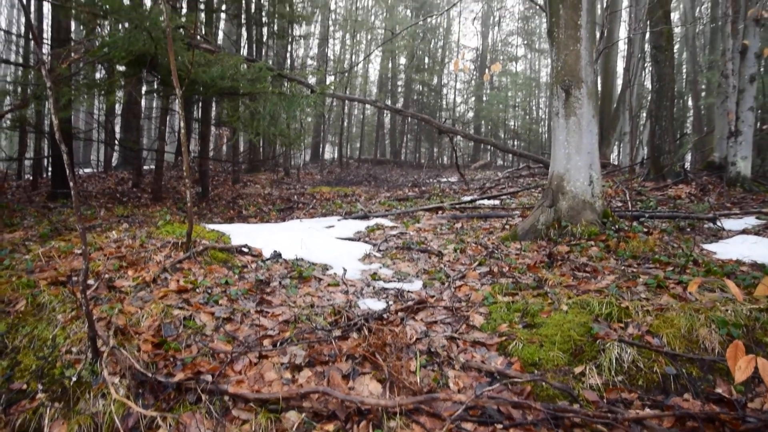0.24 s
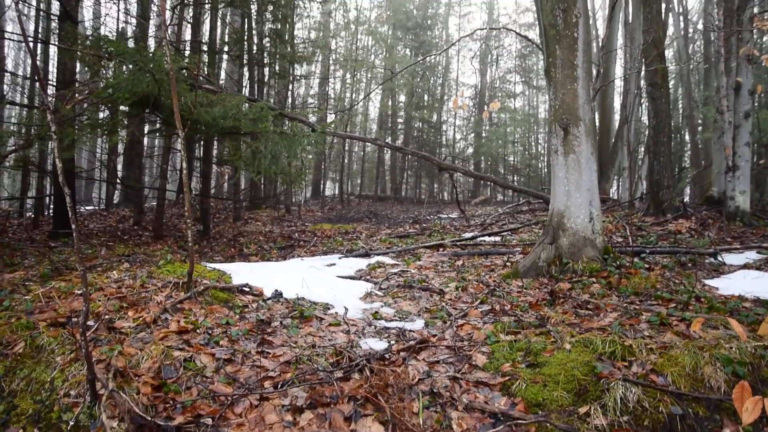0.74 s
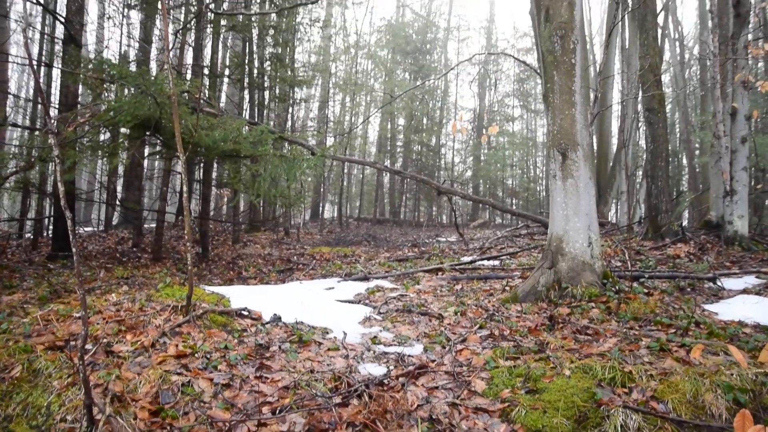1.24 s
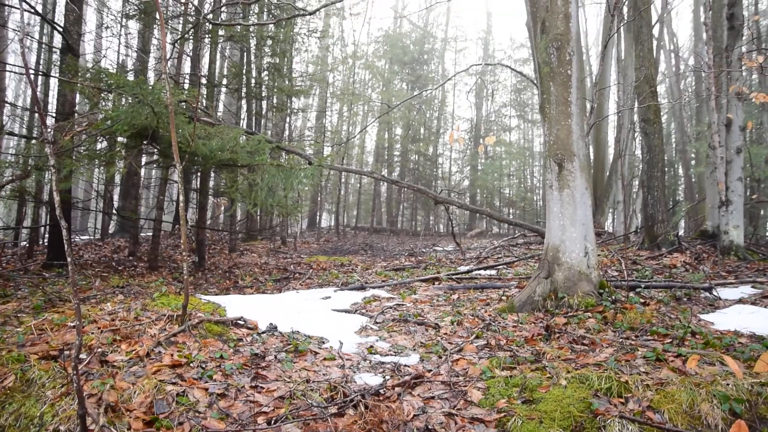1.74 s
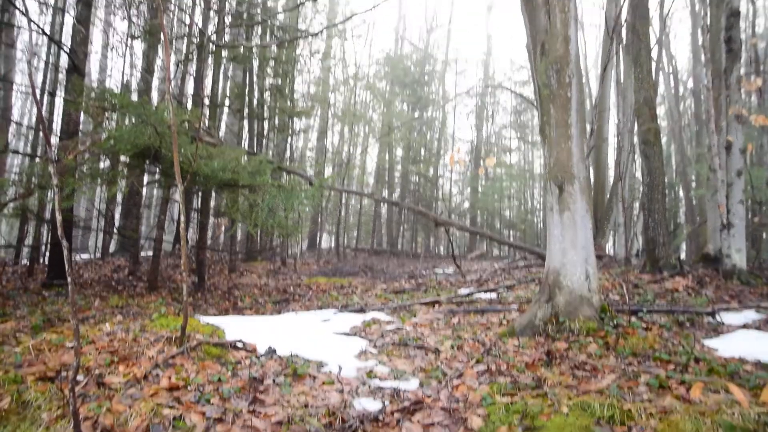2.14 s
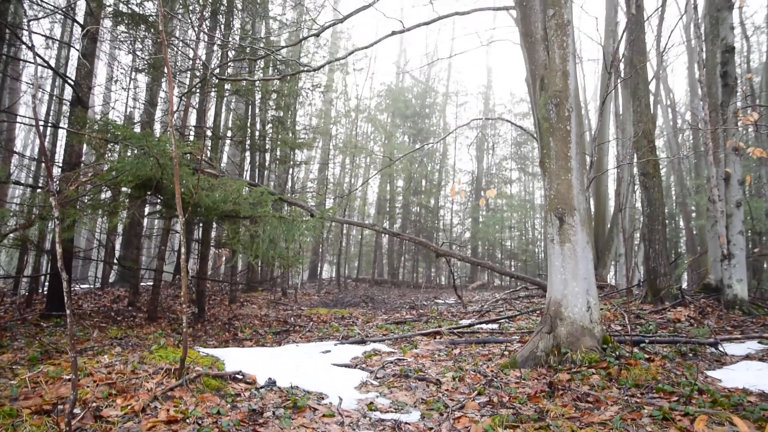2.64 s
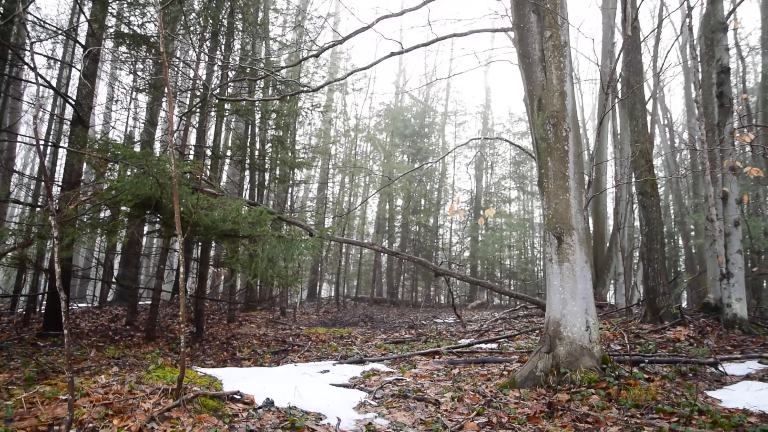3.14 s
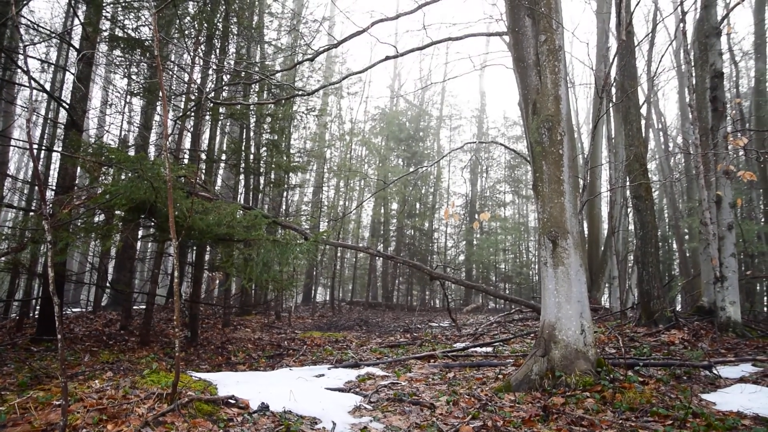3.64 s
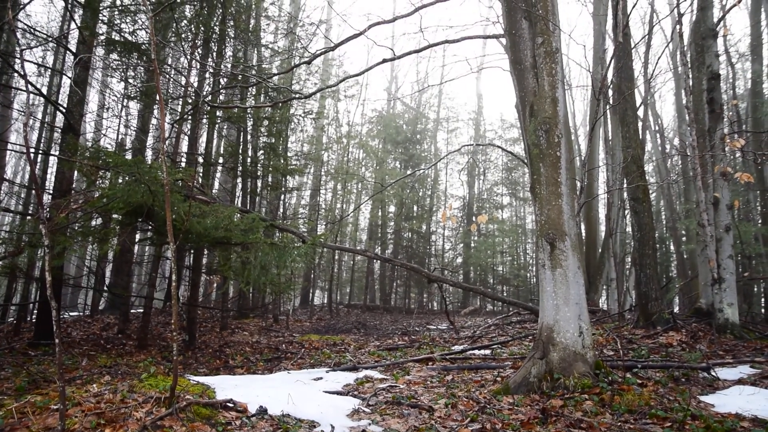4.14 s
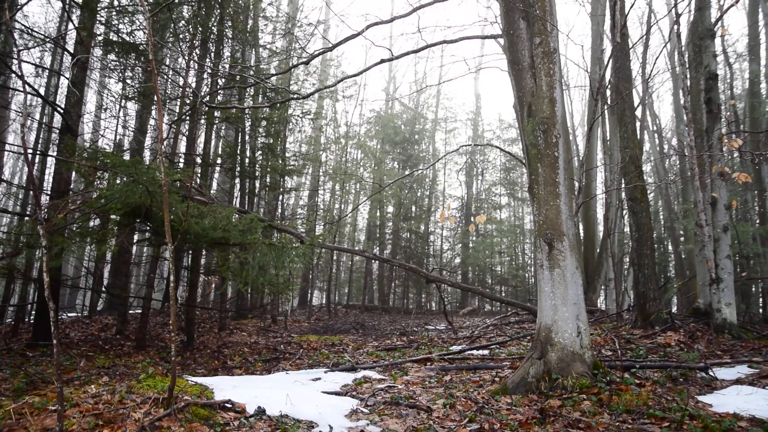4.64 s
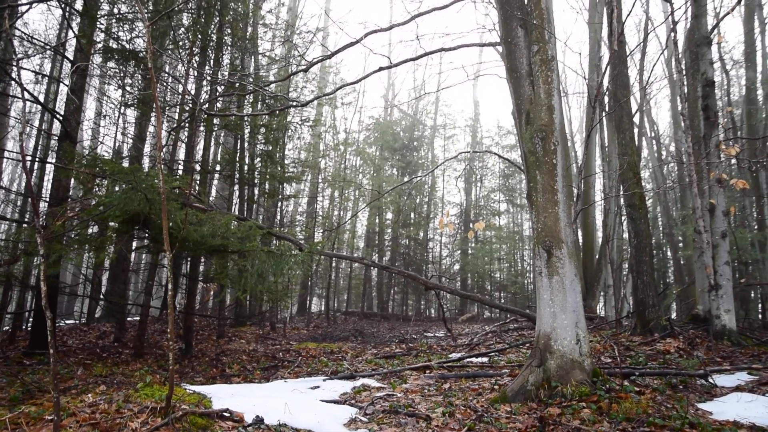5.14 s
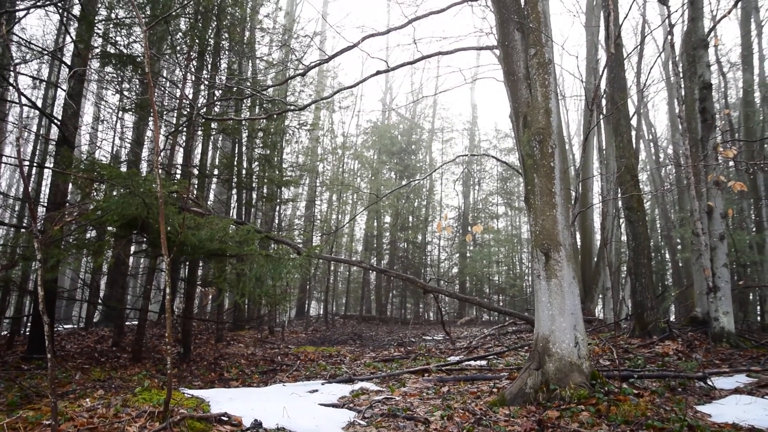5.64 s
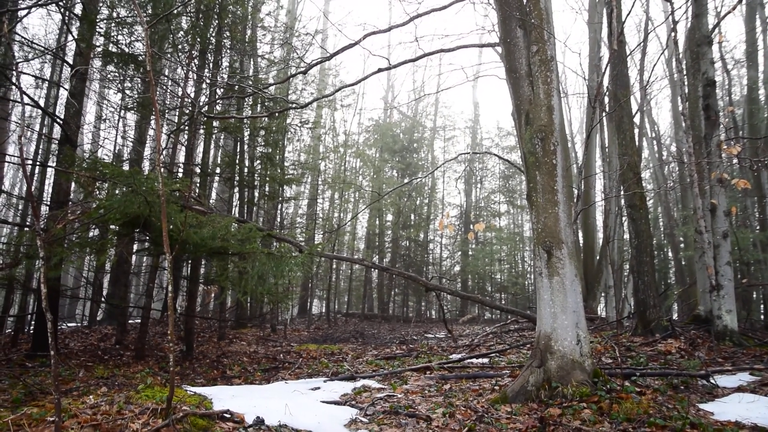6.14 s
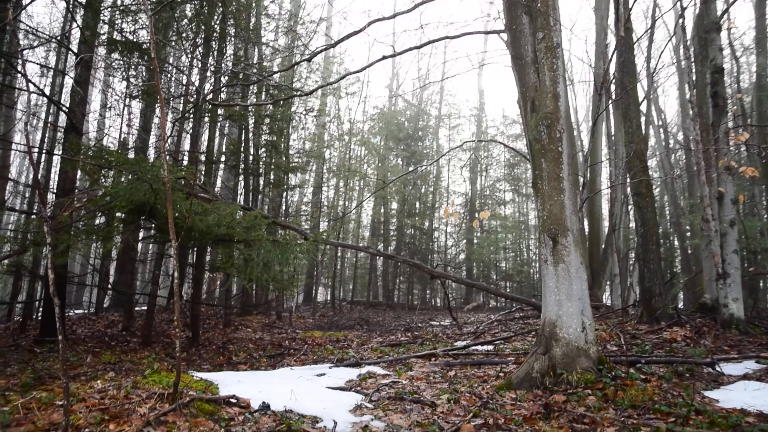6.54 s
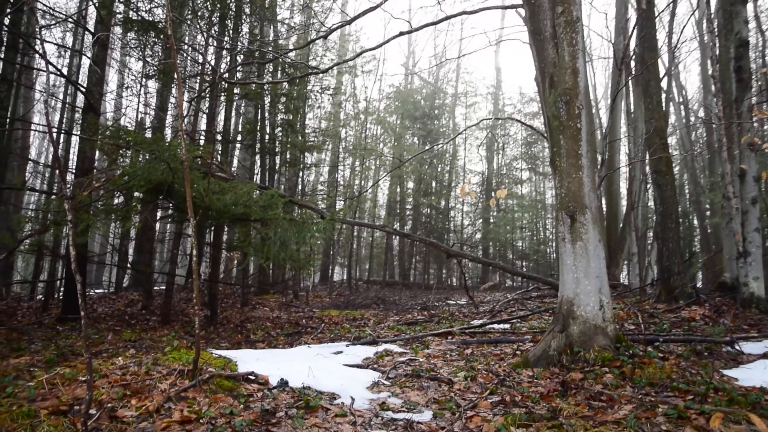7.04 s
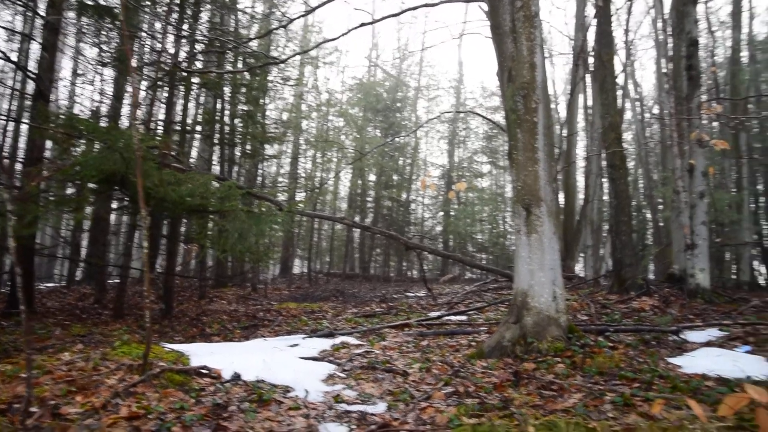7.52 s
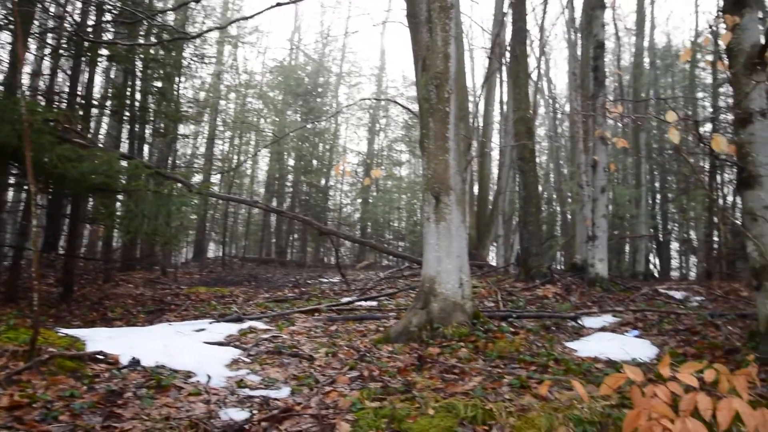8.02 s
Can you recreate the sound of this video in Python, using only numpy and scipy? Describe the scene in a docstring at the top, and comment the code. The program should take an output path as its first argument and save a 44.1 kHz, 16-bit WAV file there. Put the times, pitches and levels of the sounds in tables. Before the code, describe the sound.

A woodpecker's rapid roll on a hollow trunk dominates the middle, its woody knocks speeding up, fading late and ringing through the trees. Before it come brief whistled chirps and two distant caws; afterward, sparse drips on leaves and faint chirps. The camera microphone also picks up close plastic creaks, constant gritty motor noise, soft hiss and a very thin high whine, ending with a click and rubbing.

```python
"""Woodpecker roll in a misty forest

A woodpecker drums one quickening roll on a hollow trunk: pulses ring trunk modes, trunks echo, a long tail
follows. A far crow (pulses through a throat) caws twice, small birds chirp (gliding tones), drops fall on
leaves (noise). The hand-held camera adds noise ringing in its plastic body: gritty whirr of the lens drive,
creaks, a finger rub. It also adds a snap, a weak creak just after it, and a thin electronic whistle; forest air
and microphone hiss lie beneath."""
import sys
import numpy as np
from scipy import signal
from scipy.fft import rfft, irfft, next_fast_len
from scipy.io import wavfile
from scipy.ndimage import map_coordinates

SR = 44100
rng = np.random.default_rng(int(sys.argv[2]) if len(sys.argv) > 2 else 0)


def makeup_ratio(level_db):
    """Linear amplitude ratio for a level in decibels (20 dB per factor of ten)."""
    decades = np.asarray(level_db, float) / 20
    return 10 ** decades


def master(y):
    """Save y as 16-bit WAV."""
    cut = np.clip(np.atleast_2d(y).T, -1, 1)
    pcm = np.round(cut * 32767)  # scale
    wavfile.write(sys.argv[1], SR, pcm.astype(np.int16))


N = 365148
TIME_S = np.arange(N) / SR


def unit(x):
    """Scaled to rms 1."""
    return x / np.sqrt(np.mean(x ** 2) + 1e-20)


def along(points, hz, axis=1):
    """One column of a frequency table, interpolated on a log axis."""
    table = np.transpose(points)
    return np.interp(np.log(hz + 1), np.log(table[0] + 1), table[axis])


def wobble(rate_hz):
    """Smooth random curve through rate_hz knots a second."""
    knots = rng.standard_normal(int(N * rate_hz / SR) + 4)
    return map_coordinates(knots, [np.arange(N) * rate_hz / SR])


def filtered(x, response):
    """x times a complex response of frequency."""
    size = next_fast_len(N + SR // 2)
    f = np.fft.rfftfreq(size, 1 / SR)
    return irfft(rfft(x, size) * response(f), size)[..., :N]


def delayed(f, s):
    """Response of a pure delay."""
    return np.exp(-2j * np.pi * f * s)


def resonance(f, hz, width_hz):
    """One damped resonance, gain 1 at its centre."""
    return 1j * f * width_hz / (hz * hz - f * f + 1j * f * width_hz)


def modes(table):
    """Response of resonances side by side, successive rows in opposite phase."""
    def response(f):
        return sum((-1) ** k * makeup_ratio(db) * resonance(f, hz, width_hz)
                   for k, (hz, width_hz, db) in enumerate(table))
    return response


def add(x, s, piece):
    """Mixes a piece in at time s."""
    part = x[round(s * SR):][:len(piece)]
    part += piece[:len(part)]


def forest(x, near_db, far_db, side_db):
    """Scatter as decaying noise; high and low bands die at their own rates, far trees answer later."""
    # scatter: f/Hz, near t60/s, far t60/s, level/dB
    scatter = [(300, 0.51, 1.2, 2.5), (545, 0.21, 2.26, -4), (800, 0.32, 1.7, -0.5),
               (1090, 0.41, 1.39, 3.5), (1620, 0.17, 1, -2.5), (1940, .25, 0.83, 7), (2400, .25, 0.65, 4.5),
               (5000, 0.12, 0.38, -6)]
    hz, t, noise = signal.stft(rng.standard_normal((2, 2, 2 * SR)), SR, nperseg=256)
    level_db = along(scatter, hz, axis=3)[:, None]
    tail = 0
    for k, (db, rise_s) in enumerate([(near_db, .018), (far_db, .3)]):
        t60_s = along(scatter, hz, axis=k + 1)[:, None]
        layer = signal.istft(noise[k] * makeup_ratio(level_db - 60 * t / t60_s), SR, nperseg=256)[1]
        layer = layer * (1 - np.exp(-(np.arange(layer.shape[1]) / SR / rise_s) ** 2))
        tail = tail + makeup_ratio(db) * layer / np.linalg.norm(layer[0])
    mid, side = signal.fftconvolve(x[None], tail, axes=1)[:, :N] * makeup_ratio([[0], [side_db]])
    return np.array([mid + side, mid - side])


def blows():
    """Time and strength of every blow: gaps shorten, tiring sets in late, first and last blow are softer."""
    # roll tempo: blow number, gap to next blow/s
    tempo = [(0, .0966), (1, .0909), (6, .0802), (10, .0761), (15, .0726), (16, .0685), (20, .0653)]
    start_s = 3.2995
    fresh_db, tiring_db, tiring_power = 1.07, 8.5, 2.63
    first_soft_db, last_soft_db = 1.5, 1.5
    number, gap_s = np.transpose(tempo)
    k = np.arange(number[-1] + 2)
    s = start_s + np.append(0, np.cumsum(np.interp(k[:-1], number, gap_s)))
    db = fresh_db - tiring_db * (k / k[-1]) ** tiring_power
    db = db - first_soft_db * (k == 0) - last_soft_db * (k == k[-1])
    return list(zip(s, db))


def woodpecker():
    """Every blow rings the same trunk and echoes; weaker blows stay longer in contact and sound duller."""
    # hollow trunk modes: f/Hz, width/Hz, level/dB, signed gain of first swing
    trunk = [(285, 27.7, 7.5, 0.87), (471, 87, 31, 1), (522, 78, 36.9, -1), (677, 82, 27.8, 1),
             (831, 228, 21.7, 1), (958, 59, 21, -1), (1184, 302, 24.1, -1), (1365, 40, 27.5, 1),
             (1593, 399, 28.2, 1), (1604, 97, 36.1, -1), (2135, 134, 25.5, 0.77), (2264, 277, 18.5, -1.85),
             (2980, 110, 28.5, 1)]
    # beak tick on bark: f/Hz, width/Hz, level/dB
    bark = [(2950, 250, -8), (3700, 460, -16), (5000, 560, -19.5), (6300, 380, -27.5)]
    # echoes off ground and near trunks: delay/s, reflection factor
    reflections = [(.0079, -.08), (.0091, .24), (.0115, -.08), (.0153, .185), (.0287, -.1), (.0415, .075),
                   (.0541, .08), (.0686, -.07)]
    dulling_hz_s = 45  # bark and mist dull an echo: cut-off = this / delay
    roll = blows()

    def contact_s(db):
        return 0.00069 * makeup_ratio(-.22 * db)

    def knock(f):
        # bell-shaped push
        push = sum(makeup_ratio(db) * np.exp(-(f * contact_s(db)) ** 2) * delayed(f, s) for s, db in roll)
        # tick fades faster than the blow
        tick = sum(makeup_ratio(2.5 * db) * delayed(f, s) for s, db in roll)
        # soft ground swallows the lows
        ground = signal.freqs(*signal.butter(4, 253, "high", analog=True), f)[1]
        ring = sum(way * makeup_ratio(db) * resonance(f, hz, width_hz) for hz, width_hz, db, way in trunk)
        return ground * push * ring + tick * modes(bark)(f)

    def echo(f):
        return 1 + sum(share * delayed(f, s) / (1 + (f * s / dulling_hz_s) ** 4)
                       for s, share in reflections)

    direct = filtered(signal.unit_impulse(N), knock)
    echoed = filtered(direct, echo)
    return (echoed + forest(direct, -13.5, -26.5, side_db=-24)) * makeup_ratio([[.6], [-.6]])


def crow():
    """Hoarse pulses through the throat; pitch scoops up, holds, then sags as breath runs out."""
    # caws: t/s, top pitch before jitter/Hz, level/dB
    caws = [(1.755, 633, -48.5), (2.52, 616, -50)]
    # throat heard from afar: f/Hz, width/Hz, level/dB, all before squaring
    throat = [(1264, 600, -0.5), (1663, 560, 1.5)]
    caw_s, attack_s, release_s = .45, .04, 0.086
    scoop_hz, scoop_s, sag_hz, sag_power = 130.3, .025, 150.3, 3
    voice = np.zeros(N)
    for s, top_hz, db in caws:
        t = np.clip(TIME_S - s, 0, caw_s)
        pitch_hz = top_hz - scoop_hz * np.exp(-t / scoop_s) - sag_hz * (t / caw_s) ** sag_power
        phase = 2 * np.pi * np.cumsum(pitch_hz * (1 + .03 * wobble(100))) / SR
        pulses = sum(np.cos(k * phase) for k in range(1, 5)) * makeup_ratio(4 * wobble(160))
        envelope = np.clip(np.minimum(t / attack_s, (caw_s - t) / release_s), 0, 1)
        voice += makeup_ratio(db) * envelope * unit(filtered(pulses, lambda f: modes(throat)(f) ** 2))
    return makeup_ratio(-3.5) * voice + forest(voice, -6, -7.5, side_db=-18.0)


def songbirds():
    """Short gliding whistles, far off and fluttering, with forest scatter."""
    # notes: t/s, length/s, start f/Hz, end f/Hz, level before flutter/dB
    chirps = [(.04, .2, 2200, 2240, -55), (.65, .04, 3380, 3500, -55), (.698, .05, 3120, 2620, -46),
              (.755, .04, 2750, 3100, -55), (.885, .05, 2950, 2620, -53), (.90, .025, 2350, 2300, -51),
              (.93, .02, 2420, 2200, -52), (.945, .035, 2190, 2150, -48), (1.01, .06, 2580, 2950, -55),
              (1.045, .035, 2330, 2400, -48), (5.575, .03, 2800, 2430, -50), (5.795, .035, 2640, 2560, -48),
              (6.305, .11, 2310, 2240, -50), (6.45, .075, 2600, 2120, -47)]
    notes = np.zeros(N)
    for s, length_s, start_hz, end_hz, db in chirps:
        size = round(length_s * SR)
        phase = 2 * np.pi * np.cumsum(np.linspace(start_hz, end_hz, size)) / SR
        add(notes, s, makeup_ratio(db) * np.hanning(size) ** .5 * np.sin(phase))
    notes = notes * unit(makeup_ratio(3.5 * wobble(45)))
    return notes + forest(notes, -12, -18, side_db=-8)


def drops():
    """A bright noise tick, a dull resonant thud on the leaf, then grainy spray."""
    # drops on leaves: t/s, level/dB, tick f/Hz, thud re level/dB, splash re level/dB
    hits = [(1.76, -51, 10300, -4, -13), (3.5476, -37, 10000, -7, -20.5), (4.142, -47.5, 10000, -11.5, -21),
            (5.0219, -34.5, 6100, -4.5, -5), (6.849, -37.5, 10460, -2, -19.5),
            (7.679, -57, 10000, -16, -29)]
    ticks, thuds, t = np.zeros((2, N)), np.zeros(N), np.arange(SR // 6) / SR
    grain = unit(makeup_ratio(4 * wobble(300)))
    for s, db, hz, thud_db, splash_db in hits:
        tick = makeup_ratio(db + 10.0 - 60 * t / 0.002)
        spray = makeup_ratio(db + splash_db - 60 * t / 0.31) * grain[round(s * SR):][:len(t)]
        band = signal.butter(2, [.5 * hz, 1.3 * hz], "band", fs=SR, output="sos")
        for side in ticks:
            add(side, s, signal.sosfilt(band, (tick + spray) * rng.standard_normal(len(t))))
        rustle = makeup_ratio(-60 * t / 0.015) * rng.standard_normal(len(t))
        push = 3 * makeup_ratio(-60 * t / 0.00064)
        add(thuds, s, makeup_ratio(db + thud_db) * (rustle - push))
    return ticks + filtered(thuds, modes([(1090, 2400, 10.5), (3640, 690, 1.4)]))


def lens_drive():
    """Gritty noise: uneven friction modulates all bands at once; partly own to each microphone path."""
    # whirr before body: t/s, level/dB
    whirr = [(0, -37.5), (.5, -39), (4.2, -39), (4.7, -40.5), (6.1, -39), (6.7, -38), (7.2, -41),
             (8.28, -38)]
    grit = unit(makeup_ratio(2.66 * wobble(400) + 0.92 * wobble(60) + 0.2 * wobble(11)))
    drive = grit * makeup_ratio(np.interp(TIME_S, *np.transpose(whirr)))
    common, *own = rng.standard_normal((3, N))
    return drive * (1.01 * common + 0.31 * np.array(own))


def handling():
    """Creaks as short noise bursts; a finger presses in, then rubs on."""
    # shell creaks: t/s, level/dB, half-height length/s
    creaks = [(0.312, -38, .0033), (0.424, -36, 0.0054), (0.463, -35, 0.0044), (1.273, -40, 0.0063),
              (6.909, -33.5, 0.005), (7.379, -34.5, 0.014), (7.408, -35.5, 0.013), (7.493, -35.5, .008),
              (7.604, -38, .0048)]
    # rub and creak input to body: f/Hz, level/dB
    skin = [(1500, -5.5), (2500, 0.5), (5500, 7), (7200, -4), (10000, 5), (12000, 0)]
    rub_start_s, rub_rise_s, rub_db = 8.1, 0.059, -33
    bursts = np.zeros(N)
    for s, db, length_s in creaks:
        add(bursts, s, makeup_ratio(db) * np.hanning(round(2 * length_s * SR)))
    press = np.clip((TIME_S - rub_start_s) / rub_rise_s, 0, 1) ** 2
    bursts += makeup_ratio(rub_db) * press * unit(makeup_ratio(1.4 * wobble(150)))
    return filtered(bursts * rng.standard_normal(N), lambda f: makeup_ratio(along(skin, f)))


def snap():
    """Two short pushes ring a small part: a snap, then a weak creak just after."""
    # pushes: t/s, level/dB
    pushes = [(8.0537, 6.5), (8.077, -11.5)]
    # ring of the snapped part: f/Hz, width/Hz, level/dB
    latch = [(2580, 206, -1.5), (3400, 450, -11), (4800, 610, -18), (7360, 5000, -20), (10000, 720, -14)]
    clicks = np.zeros(N)
    for s, db in pushes:
        add(clicks, s, makeup_ratio(db) * np.hanning(9))
    # part too small to push out lows
    ring = filtered(clicks, lambda f: modes(latch)(f) * (f > 1900))
    return ring * makeup_ratio([[-3], [2]])


def camera():
    """Drive and handling shake the plastic body, whose modes reach each microphone at their own levels."""
    # body modes: f/Hz, width before squaring/Hz, left level/dB, right level/dB
    shell = [(740, 230, -8, -13), (1217, 344, -5, -1), (1675, 410, -14.5, -9.5), (2303, 350, -2.5, -1.5),
             (2666, 350, -5, 4.5), (2865, 386, 3.5, -11.5), (3552, 290, 4.5, -23), (3820, 66, -16, -23.5),
             (4366, 260, -11.5, -11), (4455, 123, -9, -3.5), (5340, 680, -25, -9), (6160, 480, -12.5, -26),
             (6993, 400, -2, -13), (7178, 195, -1.5, -9.5), (8020, 140, -18, -12.5),
             (7620, 340, -10.5, -23), (8530, 760, -16.5, -20.5), (9410, 670, -39.5, -25.5),
             (11500, 240, -36, -52), (13600, 400, -36.5, -40)]

    def body(f):
        # squared resonance: steep skirts, dark valleys
        return sum(np.outer([makeup_ratio(left_db), makeup_ratio(right_db)], resonance(f, hz, width_hz) ** 2)
                   for hz, width_hz, left_db, right_db in shell)

    return filtered(handling() + lens_drive(), body) + snap()


def whistle():
    """Thin electronic tone, slightly wavering, in opposite phase in the two channels."""
    phase = 2 * np.pi * np.cumsum(15678 + 4 * wobble(20)) / SR  # Hz
    tone = np.sqrt(2) * np.sin(phase) * makeup_ratio(1.2 * wobble(20))
    return tone * makeup_ratio([[-74], [-63]]) * [[1], [-1]]


def air():
    """Shaped noise; mid/side balance sets the likeness of the channels at each frequency."""
    # forest air and microphone hiss: f/Hz, relative density/dB per Hz, left-right likeness
    hiss = [(25.5, -26, 0.11), (45, -18, 0.88), (80.7, -13.5, 0.6), (120, -6.5, 0.89), (183, -7.5, .7),
            (500, -1.5, .6), (1000, -1.5, 0.56), (2000, -3.5, 0), (4560, -11.5, 0), (9000, -25, 0.51),
            (14100, -27, 0), (16000, -57, 0.14)]

    def mid_side(f):
        angle = np.arccos(np.clip(along(hiss, f, axis=2), -1, 1)) / 2
        return makeup_ratio(along(hiss, f)) * [np.cos(angle), np.sin(angle)]

    mid, side = filtered(rng.standard_normal((2, N)), mid_side)
    return makeup_ratio(-57 + 0.19 * wobble(2.4)) * unit(np.array([mid + side, mid - side]))


def scene():
    """Forest outside, camera close by."""
    return woodpecker() + crow() + songbirds() + drops() + camera() + whistle() + air()


def roll_off(x):
    """The treble ends steeply here."""
    return signal.sosfilt(signal.butter(12, 16460, fs=SR, output="sos"), x)


def record(dry):
    """The finished mix, two channels."""
    return roll_off(dry)


dry = scene()
out = record(dry)
master(out)
```